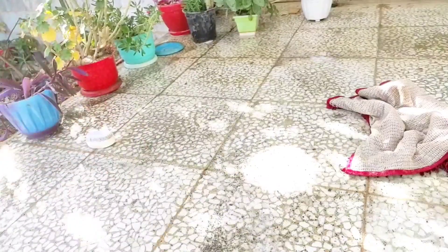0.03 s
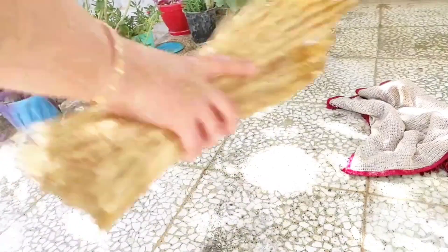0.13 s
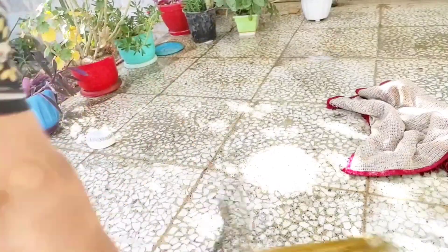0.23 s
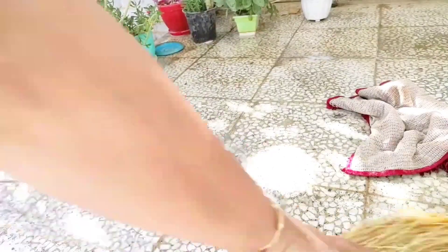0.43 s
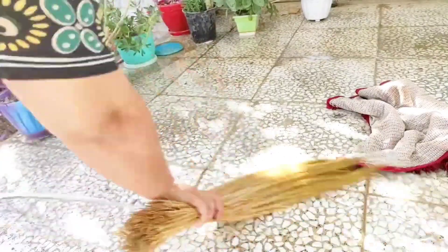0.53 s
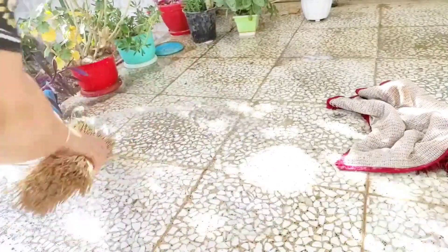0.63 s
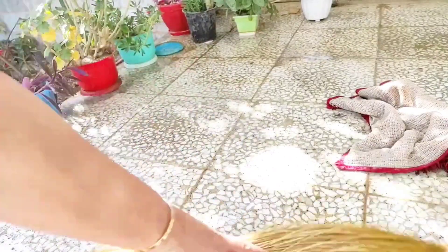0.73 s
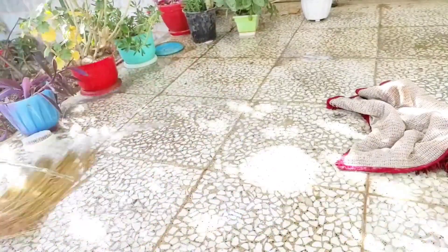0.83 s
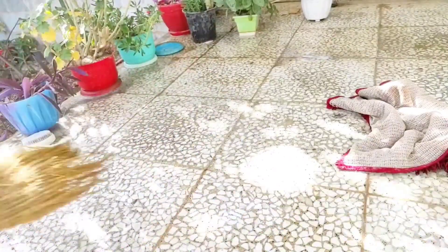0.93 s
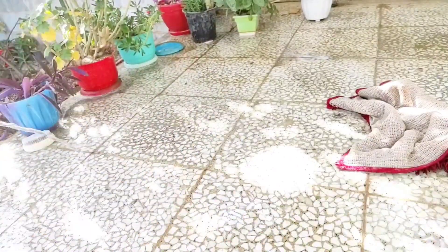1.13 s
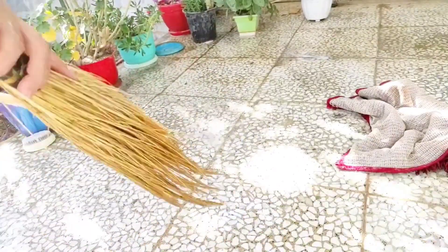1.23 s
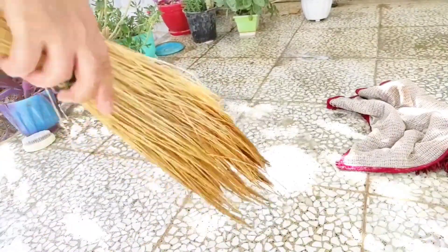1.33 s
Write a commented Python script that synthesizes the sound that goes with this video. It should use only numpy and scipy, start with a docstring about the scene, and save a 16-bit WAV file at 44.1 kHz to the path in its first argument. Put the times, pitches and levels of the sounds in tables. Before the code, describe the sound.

Close up, a straw broom brushes over stone paving in quick, scratchy strokes with tiny straw clicks. A brief hollow burble comes midway before the sweeping continues, with a faint patio echo and low outdoor noise.

```python
"""A straw broom sweeps rough patio paving in short strokes, close to a pair of microphones.
Hundreds of straw tips catch and flick free: they hiss, the stalks rustle, and the bundle
makes a lower scrape once it is pressed down. Single straws snap, and stalks skid over ridges.
A few soft thuds and a brief hollow burble join in. The patio walls add a faint echo,
and a quiet outdoor background lies under it all."""
import sys
import numpy as np
from scipy import signal
from scipy.fft import rfft, irfft
from scipy.io import wavfile
from scipy.ndimage import uniform_filter1d, map_coordinates

SR = 44100
rng = np.random.default_rng(int(sys.argv[2]) if len(sys.argv) > 2 else 0)


def store_pcm(level_fs):
    """Save levels as 16-bit WAV."""
    pcm = np.round(np.clip(level_fs, -1, 1) * 32767).astype(np.int16)
    wavfile.write(sys.argv[1], SR, np.atleast_2d(pcm).T)


N = 61739

# Tone colours, as the strength of low and high pitches: f/Hz, level/dB
AIR_COLOUR = [(20, -17), (35, -29), (55, -4.5), (85, 1), (130, -1), (250, -2), (400, -8), (700, -14),
              (1200, -20), (2500, -20), (4300, -19), (6500, -19), (8500, -31), (15000, -30)]
TIP_COLOUR = [(2500, -42.5), (4800, -14), (5700, -7.5), (6600, -7.5), (7100, -8), (7800, -11.5),
              (8500, -16), (11000, -21.5), (12300, -17.5), (15000, -22.5), (16000, -34)]
STALK_COLOUR = [(1000, -18.5), (2300, -6.5), (3100, -2.5), (3800, 3), (4600, 2.5), (5200, -5.5),
                (6800, -2.5), (8500, -25), (11000, -38), (15000, -33)]
SCRAPE_COLOUR = [(150, -59), (450, -18), (750, -10), (1000, -7), (1600, 1), (2200, -3), (2800, -3.5),
                 (4000, -6.5), (9000, -45)]
BLIP_RUSTLE_COLOUR = [(120, -41), (300, 3), (650, 0.5), (1100, -4), (1600, -18), (4000, -27)]
# Broom strokes: t/s of full contact, attack/s, hold/s, release/s, level/dB, sag during the hold/dB,
# scrape gain/dB, time to press down/s, tip gain/dB, left microphone lag/ms, spread of that lag/ms
BROOM_STROKES = [ (0.034, 0.04, .004, 0.028, -59.5, 27, 1.5, .012, 6, 0.11, 0.33),
                 (.099, 0.05, 0.014, 0.019, -50.5, -1, 0, .012, 3.5, -0.34, 0.16),
                 (0.178, 0.038, .006, 0.037, -61, -1, -14, .012, 6, 0, .4),
                 (0.24, 0.012, 0.026, .03, -43.5, -2, -5, .004, 6, -0.41, 0.097),
                 (0.286, .042, 0.058, 0.047, -30.3, 5.2, -4.2, .014, 3.7, -0.08, 0.43),
                 (.399, 0.017, 0.039, .04, -55.5, 5, 4.5, .012, 4, 0.021, 0.48),
                 (0.453, 0.045, .04, 0.057, -45, 6, -23, .012, 5, -0.41, 0.29),
                 (.549, 0.066, 0.056, 0.088, -36, 0.7, 0.7, .028, 2.5, -0.16, .4),
                 (0.752, 0.032, .022, 0.049, -51.5, 0, -3, .012, 4.5, 0, 0.36),
                 (0.794, 0.017, 0.016, 0.048, -35, -1.7, -5, .016, 2.2, 0, 0.016),
                 (0.821, 0.035, 0.08, 0.05, -37.3, 9.5, -1.5, .01, 3, -0.28, 0.36),
                 (0.958, .002, 0.01, 0.029, -45, 8, -5, .012, -2, 0.018, 0.095),
                 (0.984, 0.024, .032, 0.032, -36, 3, -3, .008, -7, .22, 0.016),
                 (1.053, 0.055, .06, 0.05, -37.5, -1.5, -6, .025, .5, -0.26, 0.37),
                 (1.219, 0.041, 0.0078, 0.022, -46, 0.5, -8, .012, 3, 0.18, 0.031),
                 (1.237, 0.031, 0.017, 0.018, -50, -0.5, 1, .012, 2.5, 0.18, .1),
                 (1.286, 0.038, 0.0071, 0.083, -52.5, 2.5, -2, .012, 4.5, -0.071, 0.48),
                 (1.367, 0.018, 0.016, 0.021, -63, 0.5, 11, .012, -2, -0.065, 0.56)]
# Pitches at which the straw bundle rings: f/Hz, width/Hz, gain/dB
BUNDLE_RINGS = [(4500, 40, -3), (4660, 30, -4), (5680, 25, -3), (6010, 45, -2), (6230, 60, 1),
                (6490, 50, 2), (6770, 50, 4), (7400, 48, -7)]
# Soft thuds: t/s of the peak, level/dB, fade time/s
SOFT_THUDS = [(0.24, -53.5, 0.012), (0.34, -58, 0.024), (0.939, -56.5, 0.031)]
# Single straws snapping: t/s, level/dB, f/Hz, time to fall 30 dB/s, left over right/dB
STRAW_SNAPS = [(.2424, -24.5, 6300, .007, 8), (0.2865, -25, 6600, 0.0085, -3),
               (.6562, -18.5, 6400, .005, -2), (.6598, -28, 5200, .004, 8), (.6623, -28, 5800, .009, -7),
               (.6660, -35, 6200, 0.026, 0), (0.7103, -33.5, 6900, .014, -2), (.8085, -29, 6200, .014, 0),
               (.9540, -40, 9500, 0.0046, -4), (.9545, -41, 4700, .008, -2), (0.9885, -32, 4400, 0.015, 1),
               (1.217, -35.5, 6000, 0.011, -10)]
# Stalks skidding: t/s, length/s, start f/Hz, end f/Hz, width/Hz, level/dB
STALK_SKIDS = [(.657, .015, 4100, 3200, 1000, -39), (.660, .017, 2300, 1500, 1200, -45),
               (.315, .044, 4600, 4350, 700, -39), (.793, .018, 3600, 2500, 1000, -41.5),
               (.819, .019, 4100, 3750, 600, -39), (.814, .021, 1600, 1050, 900, -44),
               (.984, .039, 4100, 3900, 1500, -42.5), (1.095, .024, 4500, 3800, 1500, -40)]
# Hollow blips: t/s, start f/Hz, end f/Hz, fade time/s, tone level/dB, rustle level/dB
HOLLOW_BLIPS = [(0.625, 640, 680, 0.017, -43.5, -46), (0.631, 830, 1020, 0.013, -40.5, -43.5),
                (.657, 620, 300, .024, -47, -56), (.681, 350, 247, 0.016, -46, -53),
                (0.694, 270, 256, 0.024, -43.5, -53), (0.712, 739, 450, 0.028, -54.5, -57),
                (.726, 320, 280, .018, -44, -50), (.742, 265, 258, .026, -47.5, -57),
                (1.312, 489, 430, 0.018, -51, -49)]

FREQS = np.fft.rfftfreq(N, 1 / SR)  # f/Hz of each point in a spectrum


def undb(db):
    """Turn decibels into a number to multiply by."""
    return 10 ** (np.asarray(db) / 20)


def unit(x):
    """Scale a signal so that its average power is 1."""
    return x / np.sqrt(np.mean(x ** 2))


def pan(db):
    """Left and right gains that make the left side db louder than the right."""
    return undb(np.array([[db], [-db]]) / 2)


def colour(x, points):
    """Give a sound a tone colour, joining the points of its table with lines."""
    hz, db = np.array(points).T
    return irfft(rfft(x) * undb(np.interp(np.log(FREQS + 1), np.log(hz), db)), N)


def wander(turns_per_s):
    """A smooth random wobble with a typical size of 1."""
    step = max(int(SR / turns_per_s), 2)
    return unit(uniform_filter1d(rng.standard_normal(N)[np.arange(N) // step], step))


def outdoor_air(level_db=-54.5, wide_above_hz=395):
    """Quiet outdoor noise, alike on both sides in the bass and wide higher up."""
    middle, side = rng.standard_normal((2, N))
    side = irfft(rfft(side) * FREQS / (FREQS + wide_above_hz), N)
    return unit(colour(np.array([middle + side, middle - side]), AIR_COLOUR)) * undb(level_db)


def pressure(t, attack, hold, release, sag_db):
    """The push on the broom: up 20 dB over the attack, sagging in the hold, down 20 dB per release."""
    rise_db = 20 * np.minimum(t, 0) / attack
    fall_db = 20 * np.maximum(t - hold, 0) / release
    return undb(rise_db - sag_db * np.clip(t / hold, 0, 1) - fall_db)


def flicks(lag_ms, spread_ms, per_s=8000, size_spread_db=2.5, rubbing_db=-1.5):
    """Straws slip free in a stream of tiny clicks, over the smooth noise of rubbing."""
    right = (rng.random(N) < per_s / SR) * rng.choice([-1, 1], N)
    right = right * undb(size_spread_db * np.minimum(rng.exponential(size=N), 5))
    # The straws fan out, so each click reaches the left microphone with its own lag.
    lag = np.round((lag_ms + spread_ms * rng.standard_normal(N)) * SR / 1000).astype(int)
    left = np.bincount((np.arange(N) + lag) % N, right, N)
    return unit(np.array([left, right])) + undb(rubbing_db) * rng.standard_normal((2, N))


def bundle_ring(x, bend_share=.005, bends_per_s=25):
    """The shaken bundle rings at its own pitches, which waver as the straws bend."""
    response = sum(undb(db) / (1 + 2j * (FREQS - hz) / width) for hz, width, db in BUNDLE_RINGS)
    ringing = 2 * irfft(rfft(x) * response, N)
    bent_time = np.arange(N) + np.cumsum(bend_share * wander(bends_per_s))
    return x + np.array([map_coordinates(side, [bent_time], mode="mirror") for side in ringing])


def shifting_load(x, depth_db=4.5, life_s=.028, width_hz=209):
    """Different straws carry the load from moment to moment, so narrow peaks of tone come and go."""
    f, t, cells = signal.stft(x, SR, nperseg=512, noverlap=384)
    peaks = rng.standard_normal((400, 200))
    peaks = peaks - uniform_filter1d(peaks, size=7, axis=0)  # keeps the total level about steady
    grid = np.meshgrid(f / width_hz, t / life_s, indexing="ij")
    db = depth_db * map_coordinates(peaks, grid, mode="mirror")
    return signal.istft(cells * undb(db), SR, nperseg=512, noverlap=384)[1][:, :N]


def broom(t, bump_db=1.24, bumps_per_s=140):
    """Each stroke makes the tips hiss, the stalks rustle and, a little later, the bundle scrape."""
    tip_power, stalk_power, scrape_power, lag_ms, spread_ms = np.zeros((5, N))
    for at, attack, hold, release, db, sag_db, scrape_db, press_s, tip_db, lag, spread in BROOM_STROKES:
        force = undb(db) * pressure(t - at, attack, hold, release, sag_db)
        pressed = .5 + .5 * np.tanh((t - at + attack / 2 - press_s) / press_s)
        loudest = force ** 2 > stalk_power  # a stroke that drowns out earlier ones sets the direction
        lag_ms[loudest], spread_ms[loudest] = lag, spread
        stalk_power += force ** 2
        tip_power += (force * undb(tip_db)) ** 2
        scrape_power += (force * pressed * undb(scrape_db)) ** 2

    def layer(power, points):
        """Ringing straw clicks in one tone colour, swelling with the strokes."""
        straws = shifting_load(bundle_ring(flicks(lag_ms, spread_ms)))
        return np.sqrt(power) * unit(colour(straws, points))

    hiss = layer(tip_power, TIP_COLOUR) * pan(db=-0.9)
    rustle = layer(stalk_power, STALK_COLOUR) * pan(db=-0.6)
    scrape = layer(scrape_power, SCRAPE_COLOUR)
    bumps = undb(bump_db * wander(bumps_per_s))  # pebbled paving makes the pressure uneven
    return (hiss + rustle + scrape) * bumps


def wall_echo(x, t, gain_db=-19, gap_s=0.0069, fall_60_db_s=0.24):
    """Sound bounces off the patio walls and leaves a short, faint tail."""
    tail = rng.standard_normal((2, N)) * (t > gap_s) * undb(-60 * t / fall_60_db_s)
    return signal.fftconvolve(x, unit(tail) / np.sqrt(N), axes=1)[:, :N] * undb(gain_db)


def thuds(t, hz=89.4):
    """Soft bass thuds: a low tone swells and fades within a few waves."""
    out = np.zeros(N)
    for at, db, fade_s in SOFT_THUDS:
        swell = np.exp(-((t - at) / fade_s) ** 2)
        tone = np.sqrt(2) * np.sin(2 * np.pi * (hz * (t - at) + rng.random()))
        out += undb(db) * swell * tone
    return out


def snaps(t, width_octaves=0.29, crack_db=-22, click_db=-4.5, rattle_db=-2, scatter_db=1.5):
    """A bent straw springs free: a click and a short rattle, strongest around one pitch."""
    out = np.zeros((2, N))
    lag = round(0.00017 * SR)  # the left microphone hears it 0.17 ms later
    for at, db, hz, decay_s, pan_db in STRAW_SNAPS:
        peak = np.exp(-.5 * (np.log2((FREQS + 1) / hz) / width_octaves) ** 2)
        crack = undb(crack_db) * FREQS / (FREQS + hz)
        fade = (t >= at) * undb(-30 * np.maximum(t - at, 0) / decay_s)
        direct = rng.standard_normal(N)
        scattered = undb(scatter_db) * rng.standard_normal((2, N))  # takes its own path to each side
        rattle = unit(np.array([np.roll(direct, lag), direct]) + scattered) * fade
        click = (np.arange(N) == int(at * SR)) * np.sqrt(np.sum(fade ** 2))
        burst = undb(click_db) * np.array([np.roll(click, lag), click]) + undb(rattle_db) * rattle
        out += irfft(rfft(burst) * unit(peak + crack), N) * undb(db) * pan(pan_db)
    return out


def skids(t, edge_s=.003):
    """A stalk chatters over a ridge; its rough ring slides down as its free part gets longer."""
    out = np.zeros((2, N))
    for at, length, start_hz, end_hz, width_hz, db in STALK_SKIDS:
        hz = start_hz * (end_hz / start_hz) ** np.clip((t - at) / length, 0, 1)
        phase = 2 * np.pi * np.cumsum(hz) / SR
        touch = (np.tanh((t - at) / edge_s) - np.tanh((t - at - length) / edge_s)) / 2
        shared, left, right = (wander(width_hz) * np.cos(phase) + wander(width_hz) * np.sin(phase)
                               for _ in range(3))
        out += undb(db) * touch * unit(shared + np.array([left, right]))
    return out


def blips(t, glide_s=0.0078, attack_s=0.0019, flutter=0.2, flutter_hz=218.8):
    """The burble: short hollow tones flutter and slide to a resting pitch, each in a dull rustle."""
    out = np.zeros((2, N))
    for at, start_hz, end_hz, fade_s, tone_db, rustle_db in HOLLOW_BLIPS:
        age = np.maximum(t - at, 0)
        hz = end_hz + (start_hz - end_hz) * np.exp(-age / glide_s)
        phase = 2 * np.pi * np.cumsum(hz) / SR + rng.uniform(0, 2 * np.pi)
        tone = np.sqrt(2) * np.sin(phase + flutter * wander(flutter_hz))
        tone *= 1 + flutter * wander(flutter_hz)
        noise = rng.standard_normal(N) + rng.standard_normal((2, N))
        rustle = unit(colour(noise, BLIP_RUSTLE_COLOUR))
        swell = (1 - np.exp(-age / attack_s)) * np.exp(-(age / fade_s) ** 2)
        out += swell * (undb(tone_db) * tone + undb(rustle_db) * rustle)
    return out


def scene():
    """Add up the nearby sounds, their echo and the outdoor background."""
    t = np.arange(N) / SR
    near = broom(t) + snaps(t) + skids(t) + blips(t) + thuds(t)
    return near + wall_echo(near, t) + outdoor_air()


def record(dry):
    """The recorder cuts off the highest treble."""
    top_hz = 15500
    return signal.sosfilt(signal.ellip(8, .2, 70, top_hz, fs=SR, output="sos"), dry)


dry = scene()
out = record(dry)
store_pcm(out)
```